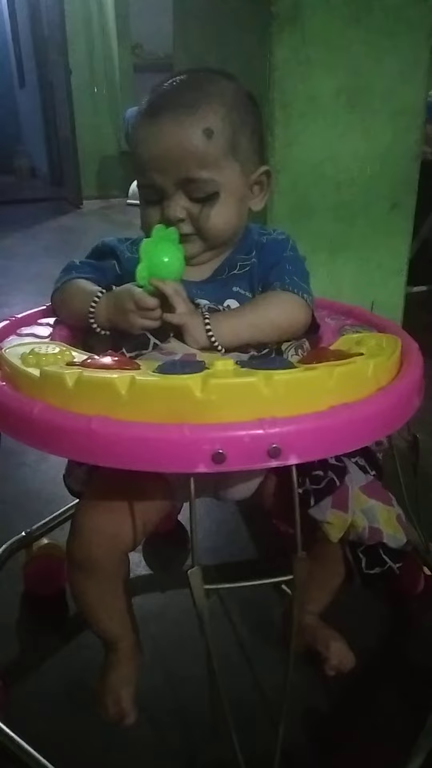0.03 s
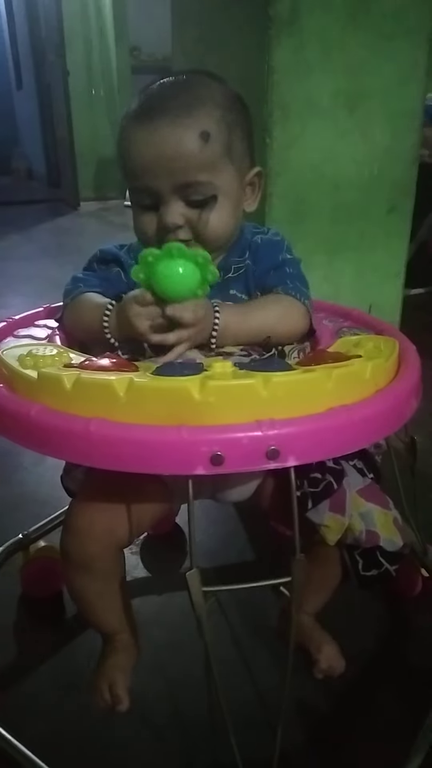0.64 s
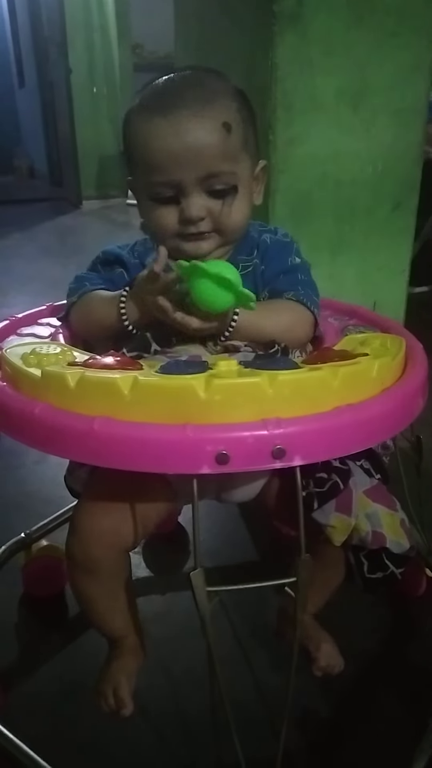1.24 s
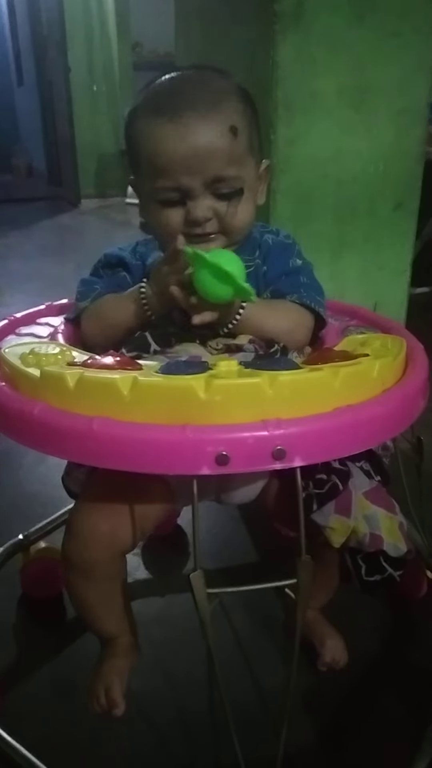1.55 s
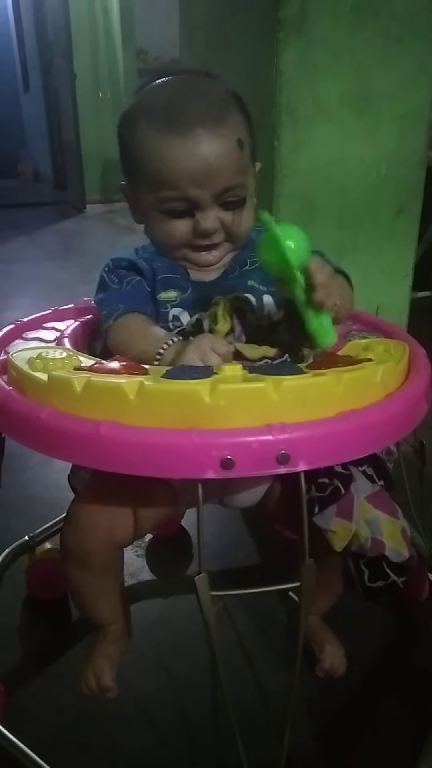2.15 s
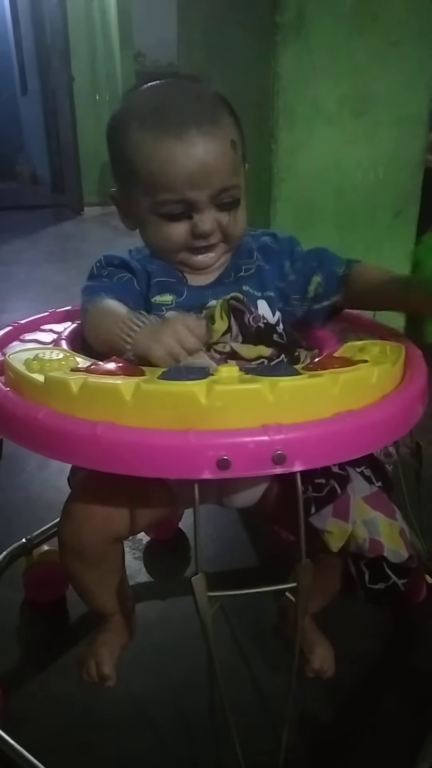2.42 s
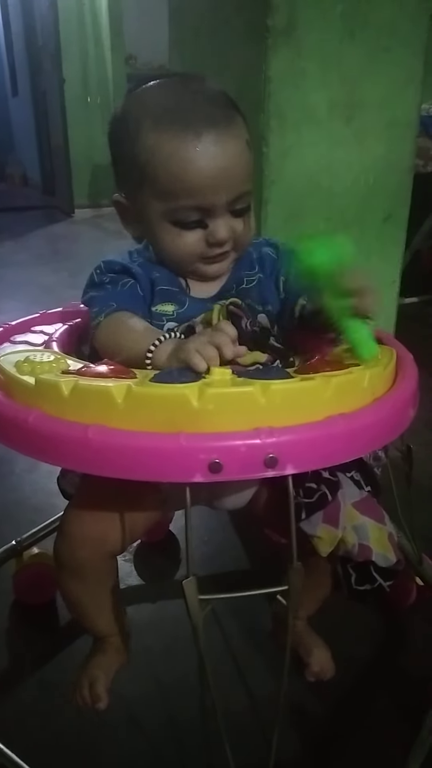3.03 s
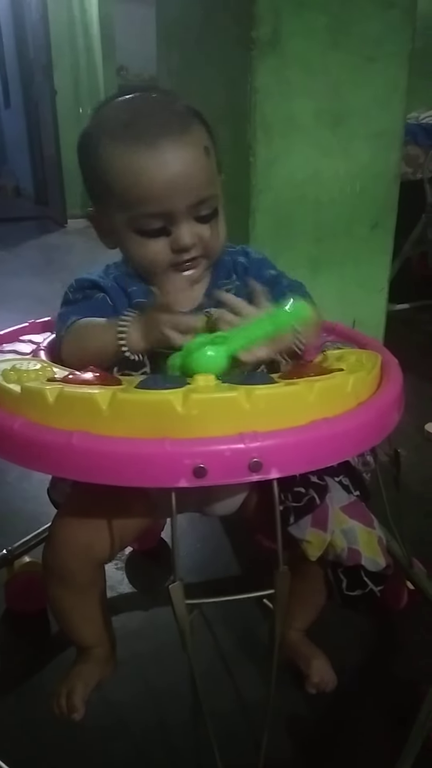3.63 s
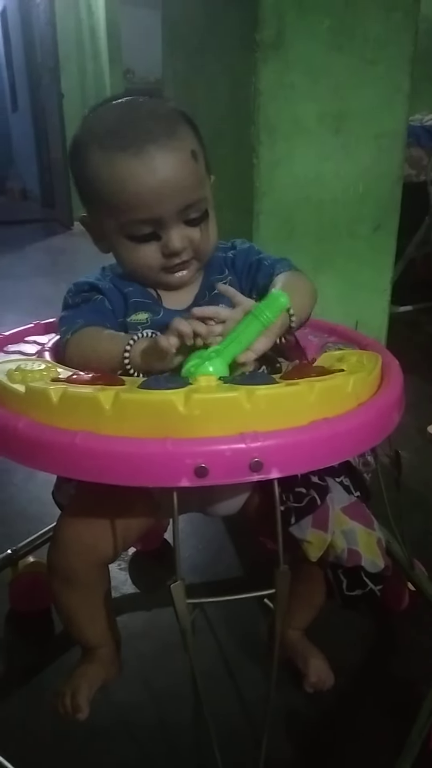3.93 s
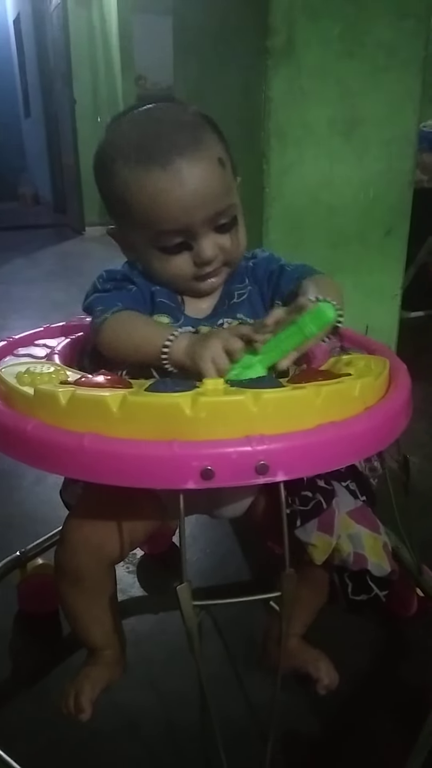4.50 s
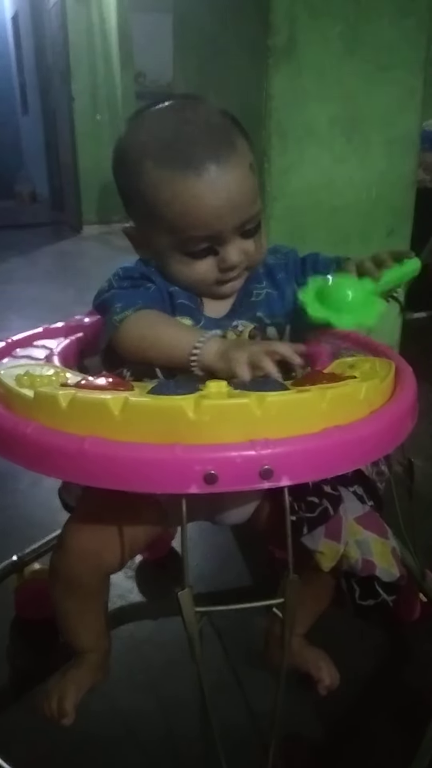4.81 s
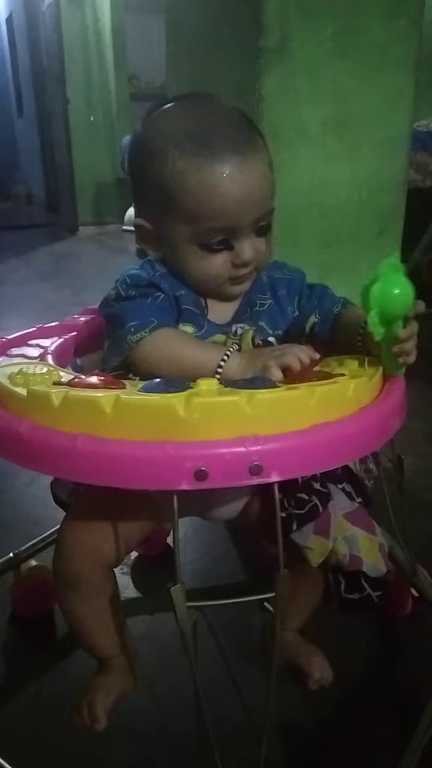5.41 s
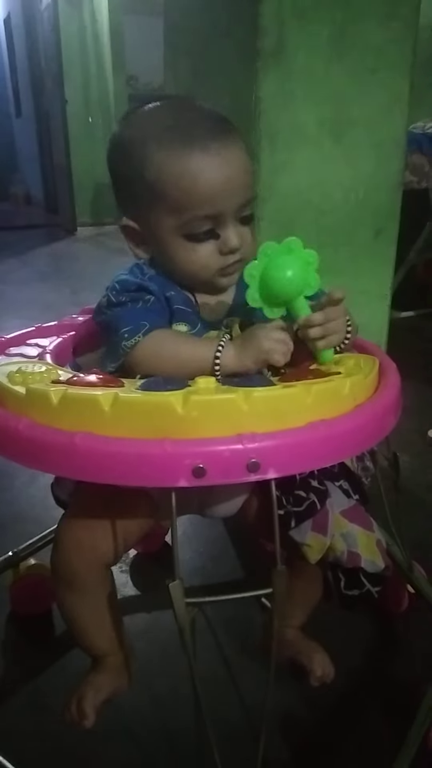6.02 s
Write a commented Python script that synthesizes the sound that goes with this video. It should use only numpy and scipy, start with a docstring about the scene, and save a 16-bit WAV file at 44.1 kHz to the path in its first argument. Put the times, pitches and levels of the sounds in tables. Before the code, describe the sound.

Beads tumble inside a plastic baby rattle, gently at first, then in louder, irregular shakes with short pauses between them. Occasional hollow clacks come from the toy hitting a plastic walker tray. The sound sits to the left, about a metre from the microphone, with a short echo from bare walls. Steady room noise and a low hum lie underneath, with faint handling thuds near the start and end.

```python
"""Baby's rattle in a walker

A baby turns and shakes a hollow plastic rattle, about a metre from a phone in a hard-walled room.
Beads tumble round the shell and strike it in bright, ringing ticks; now and then the toy knocks on the
walker's plastic tray, which clacks and booms. Underneath lie a steady room rush, a low hum and a few
soft bumps of the hand that holds the phone."""
import sys
import numpy as np
from scipy import signal
from scipy.fft import rfft, irfft
from scipy.io import wavfile

SR = 44100
rng = np.random.default_rng(int(sys.argv[2]) if len(sys.argv) > 2 else 0)


def file_out(sig):
    """Save sig as 16-bit WAV at sys.argv[1]."""
    # one column per channel
    cols = np.atleast_2d(sig).T
    # limit, then scale
    lim = np.clip(cols, -1, 1)
    pcm = np.round(lim * 32767).astype(np.int16)
    wavfile.write(sys.argv[1], SR, pcm)


N = 276066
TIME = np.arange(N) / SR

# tone of the room rush: freq_hz, level_db
RUSH_EQ = [(41, -45), (70, -15.5), (77, -2), (125, -6), (191, -5.5), (279, -3.5), (305, -3), (382, 0),
           (624, -12), (891, -10.5), (2080, -17.5), (2220, -19.5), (4970, -24), (8870, -18.5),
           (14500, -35.5)]
# stereo image of the rush: freq_hz, likeness (0 wide, 1 mono), left_over_right_db
RUSH_IMAGE = [(60, 0.92, 1), (360, 0.72, -1), (805, 0, 0), (1860, 0, 3), (5700, 0, 0), (9750, 0, 7)]
# deep rumble under the rush: freq_hz, level_db
RUMBLE_EQ = [(15, -19), (35, 39), (70, -33), (140, -56), (600, -81)]
# the hand shifting on the phone: peak_s, level_db, half_width_s, top_hz
HAND_BUMPS = [(0.389, -46, 0.022, 22), (0.472, -40, .075, 12.5), (0.704, -55.5, 0.052, 120),
              (5.157, -51, 0.028, 73), (5.322, -45.5, 0.032, 103), (5.5, -54.5, 0.12, 77),
              (5.753, -43, 0.024, 76), (5.90, -46.5, 0.042, 108), (6.17, -54.5, .1, 69)]
# tone of the reverb send, and the share of the tail that dies slowly: freq_hz, level_db
SEND_EQ = [(200, 7), (1700, -3.5), (3300, 4), (6500, -2.0), (9000, -1.0), (13500, -3.0)]
SLOW_TAIL_EQ = [(4000, -7.5), (9000, -9.5), (14000, -18)]
# tone of the right microphone, which faces away from the toy: freq_hz, level_db
OFF_AXIS_EQ = [(2500, 0.5), (5000, 1.5), (7400, 8), (9000, -7), (11000, 0), (13500, -4.5)]
# the clack of tray and toy together: pitch_hz, level_db, t60_s
CLACK_MODES = [(380, -12, 0.014), (665, -8, 0.0062), (883, 1, 0.012), (1150, -7, 0.0059),
               (1260, 3.5, 0.0066), (1480, -6.5, 0.018), (1704, -1.5, 0.012), (1930, 3.5, 0.0088),
               (2240, -4.5, 0.016), (2900, -16, 0.0046), (3710, 3, 0.005), (4600, -8, 0.0073),
               (6150, 1.5, 0.0082)]
# the boom of the whole tray flexing: pitch_hz, level_db, t60_s
BOOM_MODES = [(176.6, -7.5, 0.34), (234, 7.5, 0.067), (297, 3, 0.099)]
# the toy knocking on the tray: start_s, level_db, favoured_pitch_hz, boom_db
TRAY_KNOCKS = [(2.1291, -49.5, 2160, -20), (2.2475, -49, 1900, -2), (2.323, -43, 1330, -16),
               (2.3319, -41.5, 1240, -3), (2.3441, -40.5, 1130, -8), (2.3983, -37, 1650, -3),
               (2.4040, -30.5, 1860, -30), (2.4082, -38, 1900, -30), (2.433, -33.5, 1500, -22),
               (3.0193, -37, 1350, -3), (3.0412, -43, 1400, -11), (3.0636, -32, 1750, -43),
               (3.5238, -37, 1390, -32), (3.624, -43, 1070, -8), (3.794, -39.5, 795, -15),
               (4.234, -52, 1640, -1), (4.7714, -42, 1290, -13), (4.9150, -47, 1890, -5),
               (5.4055, -41, 1140, -6), (5.87, -35, 1620, -31)]
# the ring of the rattle's shell: pitch_hz, level_db, t60_s
SHELL_MODES = [(2256, -9, 0.018), (3960, -10.5, 0.0067), (4570, -11.5, 0.013), (5470, -3.5, 0.0071),
               (6207, -9, 0.019), (6900, 3, 0.0073), (7700, -12, 0.0023), (8445, 1.5, 0.031),
               (9030, 9.5, 0.0087), (9415, -3, 0.024), (10170, 3.5, 0.014), (10940, 0.5, 0.0082),
               (11500, -17, 0.025), (12800, -5.5, 0.014), (13260, 3, 0.019), (14300, -11, 0.012),
               (13670, 0.5, 0.0099)]
# the shell's low, middle and top registers: bottom_hz, top_hz
SHELL_REGISTERS = [(2000, 7500), (7500, 11000), (11000, 15500)]
# the dry crack of a bead's contact: freq_hz, level_db
CRACK_EQ = [(1000, -9), (3200, -17), (4800, 4), (7600, -5.5), (8700, -1), (10600, -11), (12000, 10),
            (13600, -12)]
# how freely the rattle's head rings, damped by hand or tray or held clear: time_s, main_mode_lift_db
HEAD_FREEDOM = [(0, -1), (2.3, 2), (2.5, 0), (3.3, 5.5), (3.7, -5.5), (4.8, -7), (5.1, 4), (5.3, 7),
                (5.5, -9), (5.9, 9), (6.2, 17)]
# where the rattle is held: time_s, left_over_right_db
RATTLE_PAN = [(0, 12), (2.2, 17), (3.2, 13), (3.6, 12), (5.1, 15), (5.3, 12), (6, 16)]
# swings that throw the beads round the shell: peak_s, level_db, gather_s, settle_s, low_register_db
RATTLE_SWINGS = [(.205, -41, 0.13, .15, -10.5), (2.151, -43, 0.068, 0.11, -14),
                 (2.342, -27, 0.059, .05, -15.5), (2.52, -42, 0.063, .15, -5), (2.645, -30.5, .08, .13, -8),
                 (2.771, -34, 0.054, 0.085, -9.5), (2.87, -35.5, 0.077, 0.15, -7),
                 (3.05, -34, .06, .04, -8.5), (3.195, -33, .11, 0.083, -20),
                 (3.63, -34.5, 0.066, 0.098, -14), (3.774, -35, 0.029, .11, -17),
                 (3.871, -45.5, 0.042, 0.22, -13), (4.921, -36.5, 0.13, 0.066, -10.5),
                 (5.04, -30.5, 0.059, 0.22, -9.5), (5.334, -38.5, 0.11, 0.13, -8),
                 (5.53, -42, 0.038, 0.17, -8), (5.95, -39.5, 0.052, 0.093, -14)]
# the hardest hits of single beads: start_s, level_db, top_register_db
BEAD_STRIKES = [(0.1416, -39.5, -15), (0.204, -43.5, -15), (0.3678, -41.5, -5), (0.79, -44.5, -1),
                (0.8048, -43, 1), (1.2102, -45, -3), (1.952, -48, -7), (2.1156, -40, -4),
                (2.128, -38.5, -13), (2.1763, -26, -27), (2.1866, -30, 14), (2.195, -26, 18),
                (2.2482, -22, 11), (2.299, -21, 13), (2.328, -23, 19), (2.3477, -23, 22),
                (2.3532, -21, -14), (2.406, -27.5, -11), (2.4311, -27.5, -16), (2.4372, -26, 7),
                (2.4626, -20, 13), (2.4738, -18.5, -9), (2.4803, -24, 2), (2.4855, -17, -6),
                (2.491, -26, -1), (2.5908, -28.5, -10), (2.659, -29, -5), (2.8195, -31, -4),
                (2.856, -34, 9), (2.9436, -27, -2), (3.0192, -31, -4), (3.0407, -28, -16),
                (3.0547, -26, -16), (3.141, -32, 4), (3.1695, -28.5, 20), (3.1984, -28.5, 2),
                (3.5239, -37.5, -17), (3.5685, -32, -9), (3.5863, -34.5, -10), (3.6117, -30, 1),
                (3.6353, -29.5, -1), (3.7555, -28, -8), (3.77, -26, -10), (3.8075, -33.5, -8),
                (3.86, -32, -1), (3.9295, -34.5, -9), (4.7702, -42, -7), (4.8459, -36.5, -19),
                (4.9127, -33.5, -10), (4.9409, -29, -5), (4.9896, -22, 6), (5.0097, -22.5, 3),
                (5.0222, -24, -1), (5.0341, -25, 5), (5.0772, -27, 6), (5.1096, -29, 0),
                (5.3358, -30.5, -8), (5.4097, -28.5, -6), (5.5026, -32, -1), (5.6434, -43, -14),
                (5.8701, -29.5, -2), (5.9123, -32, -13), (5.9186, -26.5, -6), (5.9541, -29.5, -9),
                (6.0435, -35.5, -8)]


def undb(db):
    """Decibels to gain."""
    return 10 ** (np.asarray(db) / 20)


def unit(x):
    """Scale each channel to rms 1."""
    return x / np.sqrt(np.mean(x ** 2, axis=-1, keepdims=True))


def unit_attack(x, size=220):
    """Scale each channel to rms 1 over its first samples, five milliseconds by default."""
    return x / np.sqrt(np.mean(x[..., :size] ** 2, axis=-1, keepdims=True))


def colour(x, points):
    """EQ by a curve of (freq_hz, level_db) points."""
    hz, db = np.transpose(points)
    f = np.fft.rfftfreq(x.shape[-1], 1 / SR)
    return irfft(rfft(x) * undb(np.interp(np.log(f + 1), np.log(hz), db)), x.shape[-1])


def add(out, start_s, x):
    """Mix x into out from start_s."""
    i = int(start_s * SR)
    out[:, i:i + x.shape[1]] += x[:, :N - i]


def leftward(pan_db):
    """Channel gains that set the right side pan_db below the left."""
    return undb(np.array([[0], [-pan_db]]))


def ring(modes, lift_db, scatter_db, spread_rad, detune, size=2400):
    """Modes after one blow: the spot struck sets their balance, and each microphone hears another side."""
    hz, db, t60 = np.transpose(modes)
    t = np.arange(size) / SR
    chance = rng.standard_normal((5, len(hz), 1))
    hz = hz[:, None] * (1 + detune * chance[0])
    phase = 2 * np.pi * rng.random((len(hz), 1)) + spread_rad * chance[1:3]
    scatter = chance[3] + np.array([.5, -.5])[:, None, None] * chance[4]
    gain = undb((db + lift_db)[:, None] + scatter_db * scatter)
    return np.sum(gain * np.sin(2 * np.pi * hz * t + phase) * undb(-60 * t / t60[:, None]), axis=1)


def room_tone(rush_db=-55.5, hum_hz=49.4, hum_db=-62.5, rumble_db=-67, fade_in_s=0.22):
    """A steady bed of hum, rumble and rush; the rush is near mono in the bass and wide on top."""
    hz, likeness, pan_db = np.transpose(RUSH_IMAGE)
    side_db = 10 * np.log10((1 - likeness) / (1 + likeness))
    mid = rng.standard_normal(N)
    side = colour(rng.standard_normal(N), np.c_[hz, side_db])
    pair = np.array([colour(mid + sign * side, np.c_[hz, sign * pan_db / 2]) for sign in (1, -1)])
    rush = colour(pair, RUSH_EQ)
    rush *= undb(rush_db) / np.std(rush.mean(axis=0))
    hum = undb(hum_db) * np.sqrt(2) * np.sin(2 * np.pi * hum_hz * TIME) * leftward(-1.9)
    rumble = undb(rumble_db) * unit(colour(rng.standard_normal((2, N)), RUMBLE_EQ))
    return (rush + hum + rumble) * (1 - np.exp(-(TIME / fade_in_s) ** 2))


def hand_bumps(pan_db=-6):
    """Soft low thuds of the hand, carried through the phone's case."""
    out = np.zeros((2, N))
    for peak_s, db, half_width_s, top_hz in HAND_BUMPS:
        t = np.arange(-2.5 * half_width_s, 2.5 * half_width_s, 1 / SR)
        noise = rng.standard_normal((3, 32768))
        near_mono = noise[0] + 0.57 * noise[1:]
        thud = colour(near_mono, [(top_hz, 0), (2 * top_hz, -16), (10 * top_hz, -60)])
        swell = np.exp(-(t / half_width_s) ** 2)
        add(out, peak_s + t[0], undb(db) * unit(thud[:, :len(t)]) * swell)
    return out * undb(pan_db / 2) * leftward(pan_db)


def room_reverb(x, wet_db=-5.5, slow_t60_s=0.66, fast_t60_s=0.29, predelay_s=0.00084, build_s=0.00033):
    """Bare walls and a stone floor return a dense tail that dies sooner in the treble."""
    t = np.arange(30000) / SR
    noise = rng.standard_normal((2, len(t)))
    dark = colour(noise, SLOW_TAIL_EQ)
    tail = dark * undb(-60 * t / slow_t60_s) + (noise - dark) * undb(-60 * t / fast_t60_s)
    onset = 1 - np.exp(-np.maximum(t - predelay_s, 0) / build_s)
    tail = unit(tail * onset) / np.sqrt(len(t))
    send = colour(x[:1], SEND_EQ)
    return undb(wet_db) * leftward(1.5) * signal.fftconvolve(send, tail, axes=1)[:, :N]


def tray_knocks(clack_db=1.5, boom_trim_db=-8.5, focus_octaves=0.23, crunch_s=0.0043, pan_db=6):
    """Hollow knocks favouring the modes near their pitch: dull ones boom, tight ones clack more purely."""
    out = np.zeros((2, N))
    t = np.arange(2400) / SR
    attack = 1 - np.exp(-t / .0006)  # plastic gives a little
    for start_s, db, hz, boom_db in TRAY_KNOCKS:
        purity_db = -0.28 * boom_db
        octaves = np.log2(np.array(CLACK_MODES)[:, 0] / hz)
        focus_db = (5 + purity_db) * np.exp(-(octaves / focus_octaves) ** 2)
        clack = ring(CLACK_MODES, focus_db, scatter_db=1.5, spread_rad=.6, detune=.025)
        # countless weak, short-lived modes fill the gaps between the strong ones
        crunch_eq = [(hz / 8, -22), (hz / 2, -4), (1.12 * hz, 0), (2 * hz, -11), (6 * hz, -26)]
        crunch = colour(rng.standard_normal((2, len(t))), crunch_eq) * np.exp(-t / crunch_s)
        blow = unit_attack(clack) + undb(-1 - purity_db) * unit_attack(crunch)
        add(out, start_s, undb(db + clack_db) * leftward(pan_db) * unit_attack(attack * blow))
        boom = ring(BOOM_MODES, 0, scatter_db=2, spread_rad=.4, detune=.04, size=6000)
        add(out, start_s, undb(db + boom_db + boom_trim_db) * unit_attack(boom, size=800))
    return out


def bead_tick(time_s, low_db, top_db, attack_s=0.00056, crack_db=-6, crack_s=.0021, main_hz=8460):
    """One bead on the shell: modes ring over a dry crack, low and top registers set against the middle."""
    t = np.arange(1400) / SR
    attack = 1 - np.exp(-(t / attack_s) ** 2)
    free_db = np.interp(time_s, *np.transpose(HEAD_FREEDOM))
    out = 0
    for (lo, hi), db in zip(SHELL_REGISTERS, (low_db, 0, top_db)):
        modes = np.array([mode for mode in SHELL_MODES if lo < mode[0] <= hi])
        lift_db = free_db * (np.abs(modes[:, 0] - main_hz) < 220)
        tone = ring(modes, lift_db, scatter_db=4, spread_rad=.7, detune=0.0081, size=len(t))
        band = [(.85 * lo, -30), (lo, 0), (hi, 0), (1.15 * hi, -30)]
        noise = colour(rng.standard_normal(tone.shape), CRACK_EQ)
        crack = colour(noise, band) * np.exp(-t / crack_s)
        tick = unit_attack(tone) + undb(crack_db) * unit_attack(crack)
        out += undb(db) * unit_attack(attack * tick)
    return unit_attack(out)


def tumbling_beads(gain_db=1, edge_fade_db=20, scatter_db=5.5, jitter_s=.005, ticks_per_swing=40):
    """Light ticks in uneven clumps swell and settle with each swing; livelier beads sound brighter."""
    out = np.zeros((2, N))
    for peak_s, db, gather_s, settle_s, low_db in RATTLE_SWINGS:
        times = np.linspace(peak_s - gather_s, peak_s + settle_s, ticks_per_swing)
        pan = leftward(np.interp(peak_s, *np.transpose(RATTLE_PAN)) - 5)  # drawn in toward the centre
        for t, (late, force) in zip(times, rng.standard_normal((ticks_per_swing, 2))):
            swing_db = db - edge_fade_db * max((peak_s - t) / gather_s, (t - peak_s) / settle_s)
            bright_db = 0.034 * (swing_db + 45)  # tilt is neutral at a gentle -45 dB
            tick = bead_tick(t, low_db - bright_db, top_db=bright_db - 4)
            accent_db = scatter_db * (min(force, 1.3) - 1)
            add(out, t + late * jitter_s, undb(swing_db + gain_db + accent_db) * pan * tick)
    return out


def bead_strikes(middling_db=-33, low_per_top=0.44, low_per_force=0.48, jolt_db=6.5, jolt_s=.005):
    """Hard single hits: force goes into the middle register, and a sharp contact spreads to both ends."""
    out = np.zeros((2, N))
    for start_s, db, top_db in BEAD_STRIKES:
        low_db = -10.5 + low_per_top * top_db - low_per_force * (db - middling_db)
        if any(abs(start_s - knock[0]) < jolt_s for knock in TRAY_KNOCKS):
            low_db += jolt_db  # a knock on the tray gives the hit more body
        pan = leftward(np.interp(start_s, *np.transpose(RATTLE_PAN)))
        add(out, start_s - .0002, undb(db) * pan * bead_tick(start_s, low_db, top_db))
    return out


def scene():
    """Rattle and tray to the left with their reverb, coloured off-axis on the right, over the bed."""
    toy = bead_strikes() + tumbling_beads() + tray_knocks()
    left, right = toy + room_reverb(toy)
    return np.array([left, colour(right, OFF_AXIS_EQ)]) + room_tone() + hand_bumps()


def record(dry, open_s=.109, top_hz=14300):
    """The phone opens after a moment of silence and cuts the top."""
    opened = dry * np.clip((TIME - open_s) / .002, 0, 1)
    return signal.sosfilt(signal.cheby1(10, .2, top_hz, fs=SR, output="sos"), opened)


dry = scene()
out = record(dry)
file_out(out)
```